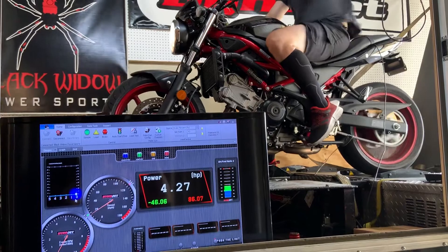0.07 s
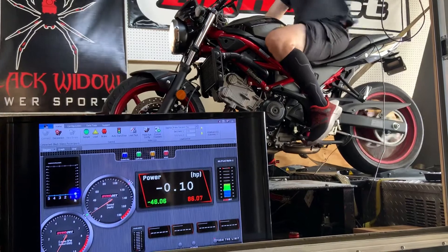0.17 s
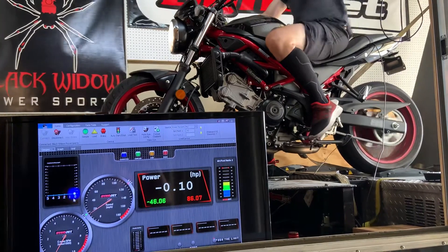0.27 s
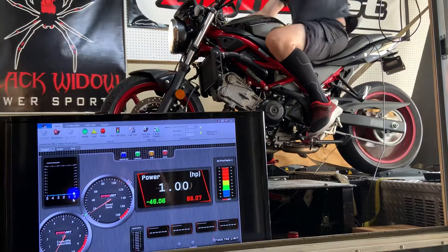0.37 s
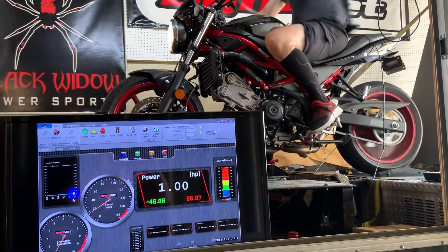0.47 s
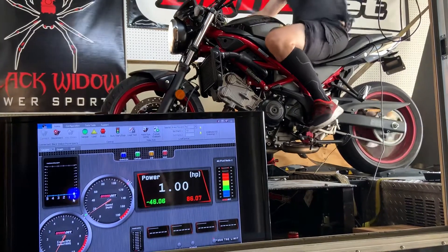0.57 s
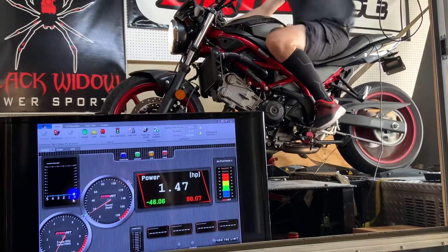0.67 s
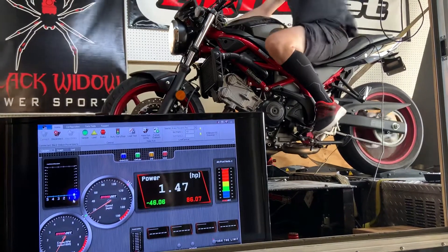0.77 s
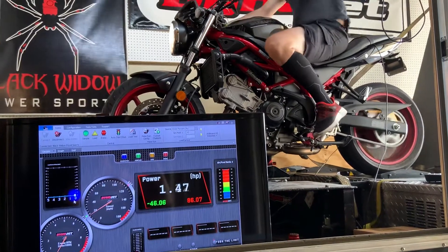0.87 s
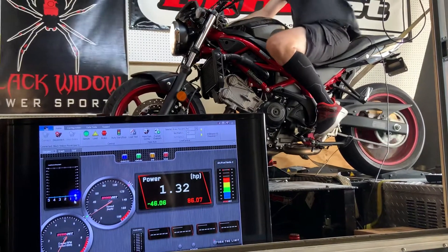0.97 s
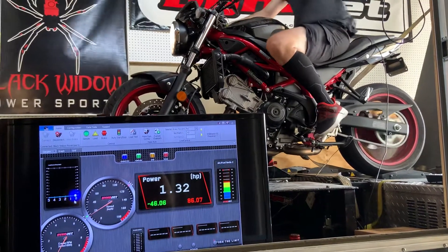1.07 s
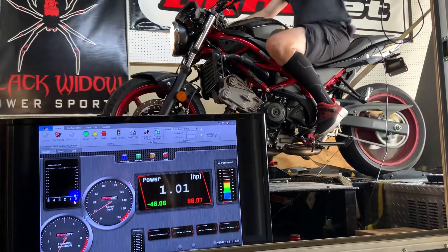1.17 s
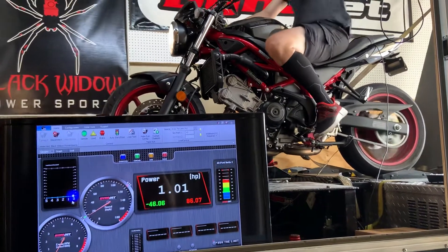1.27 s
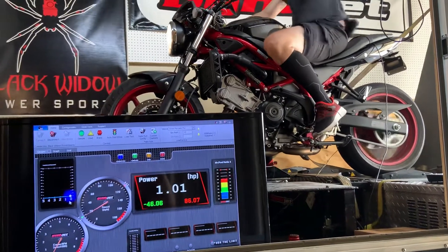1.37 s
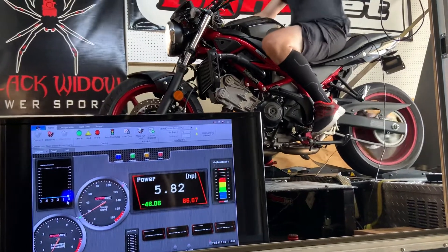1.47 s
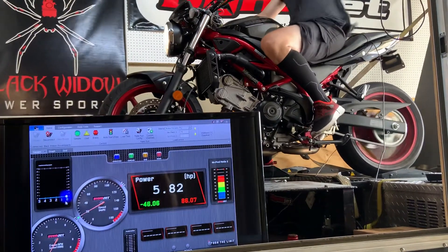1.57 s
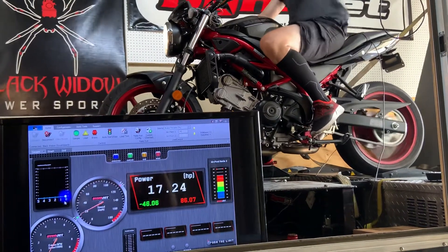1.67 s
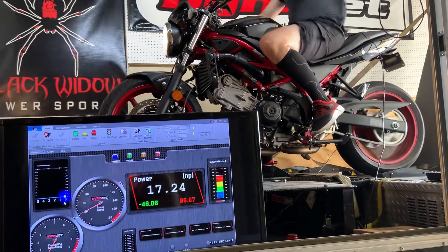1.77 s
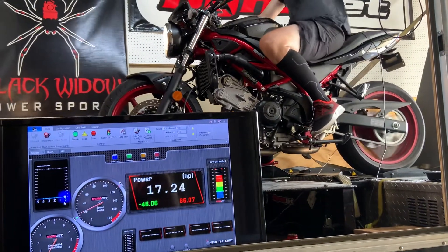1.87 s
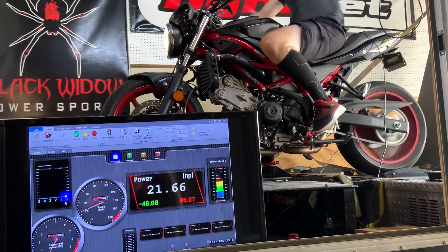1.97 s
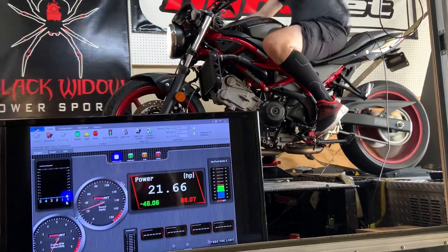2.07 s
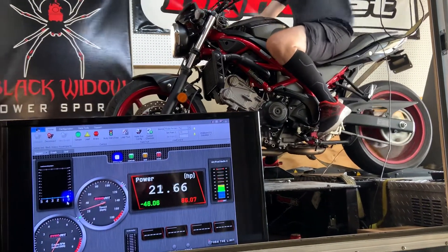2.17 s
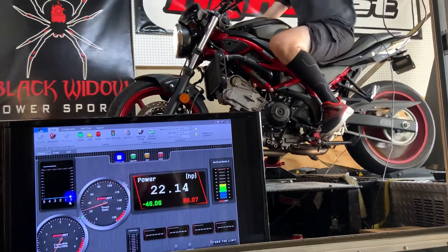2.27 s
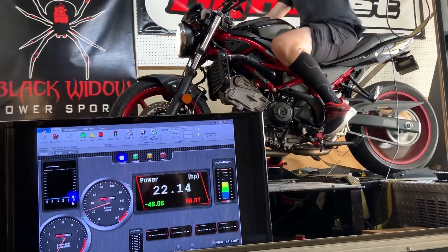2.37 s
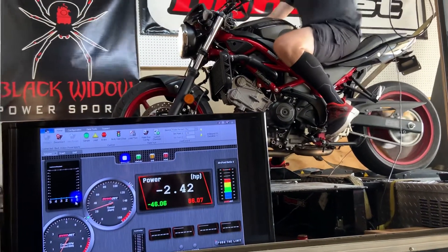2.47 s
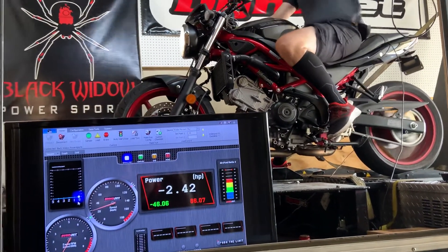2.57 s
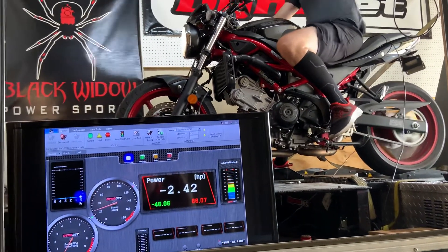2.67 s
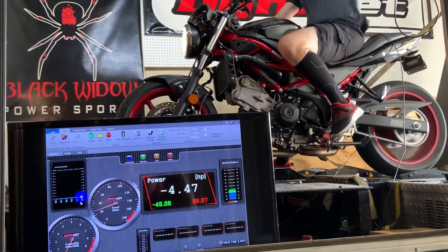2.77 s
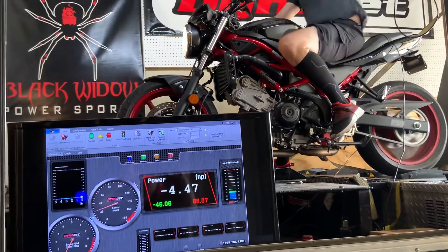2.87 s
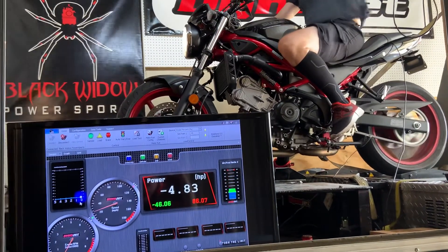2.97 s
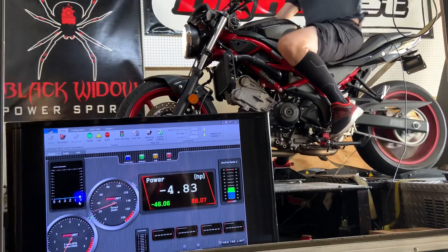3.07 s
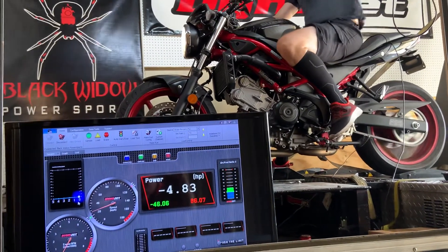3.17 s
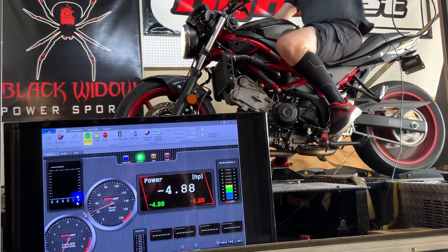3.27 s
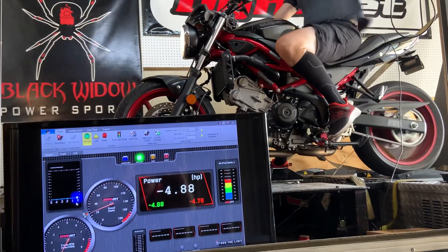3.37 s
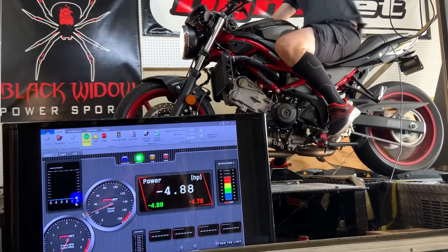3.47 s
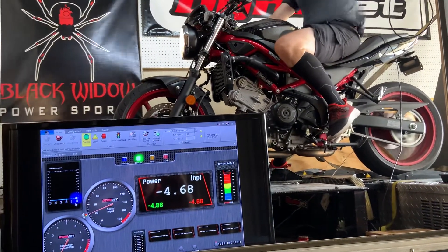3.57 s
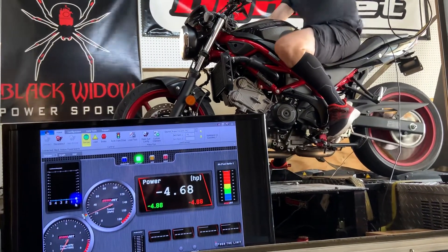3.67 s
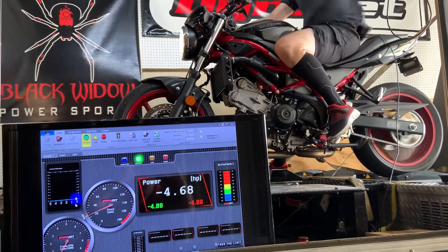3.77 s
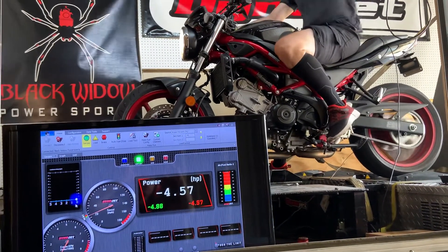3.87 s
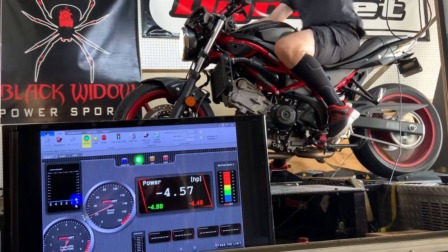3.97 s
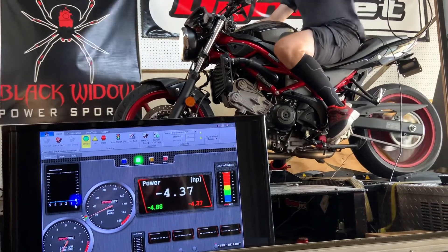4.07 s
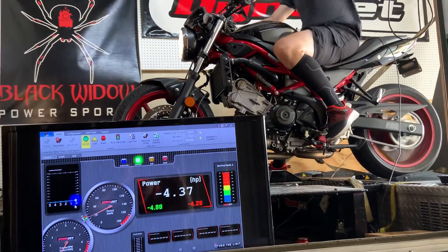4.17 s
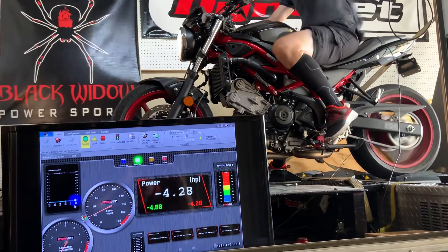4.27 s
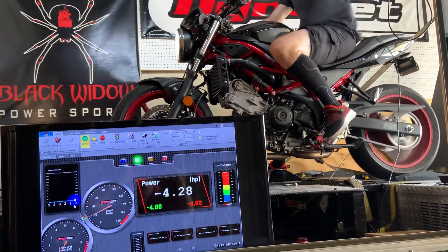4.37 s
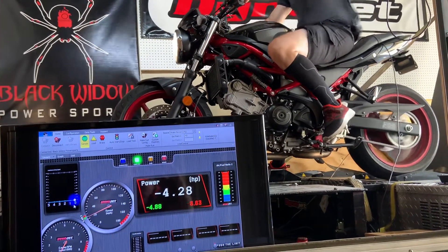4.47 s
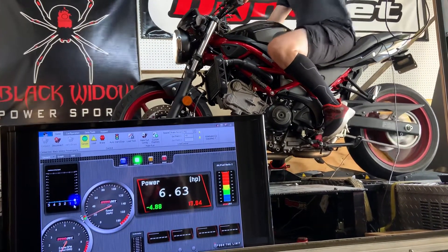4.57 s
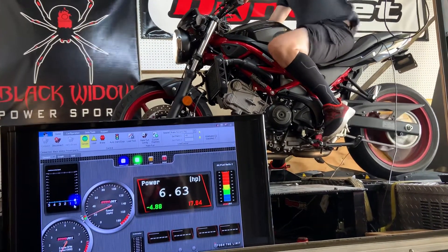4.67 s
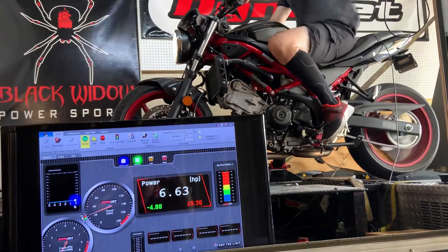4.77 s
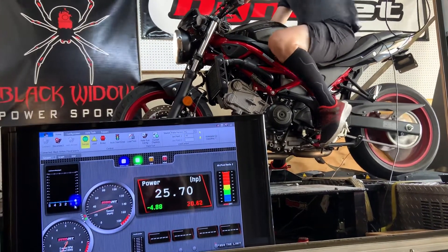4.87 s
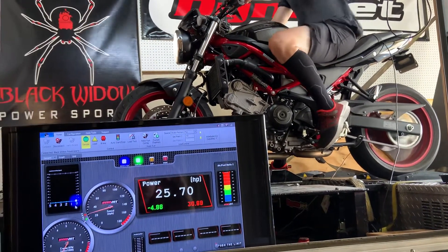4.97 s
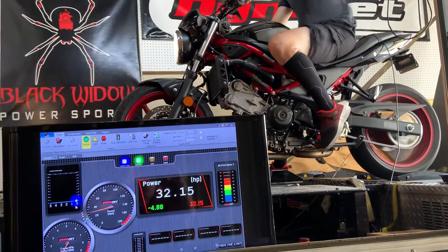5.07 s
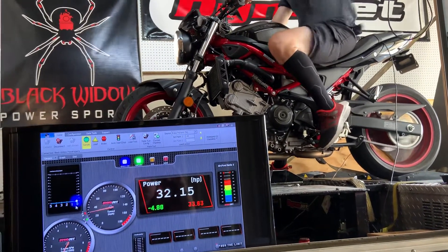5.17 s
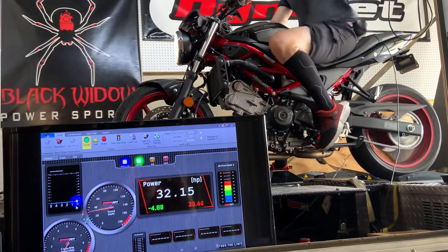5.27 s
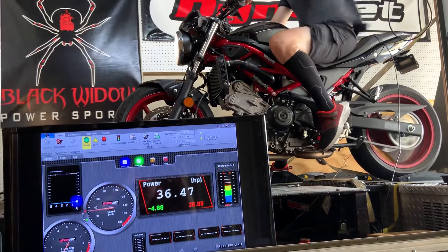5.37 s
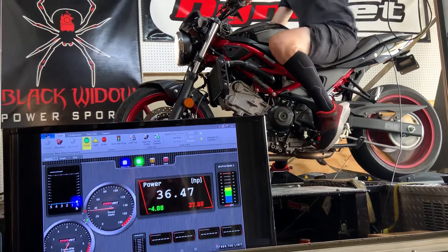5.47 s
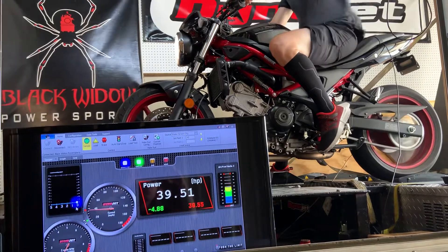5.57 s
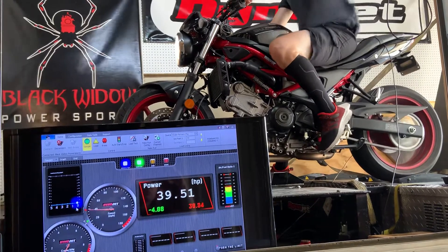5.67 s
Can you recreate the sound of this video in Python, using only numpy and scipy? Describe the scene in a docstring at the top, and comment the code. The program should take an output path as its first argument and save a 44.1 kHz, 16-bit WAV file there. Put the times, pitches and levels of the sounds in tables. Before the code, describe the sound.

A twin-cylinder motorcycle burbles unevenly, revs up hard, drops into a droning coast with chain rattle, then pulls loudly upward in a hard-walled workshop.

```python
"""A V-twin motorcycle on a roller dynamometer: light-throttle burble, blip, coast-down, full-load pull.
Uneven firing pulses ring the pipe and bark around the shop; on the coast a pumped-air drone takes over.
The slack chain rattles off load; valve gear, chain and tyre hiss with load; the tyre rumbles throughout.
Throttle and engine speed set the levels; gain steps down once the sound has stayed loud."""
import sys
import numpy as np
from scipy import signal
from scipy.fft import rfft, irfft, next_fast_len
from scipy.io import wavfile
from scipy.ndimage import uniform_filter1d

SR = 44100
rng = np.random.default_rng(int(sys.argv[2]) if len(sys.argv) > 2 else 0)


def generate_wav(sig):
    """Save sig (samples, or channels by samples) to the path in sys.argv[1] as 16-bit PCM at SR."""
    pcm = np.round(np.clip(np.atleast_2d(sig).T, -1, 1) * 32767).astype(np.int16)
    wavfile.write(sys.argv[1], SR, pcm)


N = 252693

# Engine speed. Each row: time in seconds, four-stroke cycles per second.
SPEED_CURVE = [(0.0, 17.36), (0.15, 18.5), (0.5, 18.81), (0.9, 18.95), (1.1, 19.58), (1.3, 21.09),
               (1.5, 23.36), (1.7, 25.98), (1.9, 28.73), (1.98, 28.49), (2.1, 28.22), (2.22, 27.1),
               (2.37, 28.29), (2.9, 26.87), (3.45, 25.35), (4.0, 23.9), (4.28, 23.42), (4.4, 26.36),
               (4.55, 28.3), (4.7, 30.31), (4.95, 33.94), (5.2, 37.41), (5.45, 41.09), (5.73, 45.03)]
# Rider's hand. Each row: time in seconds, throttle opening from 0 to 1.
THROTTLE_CURVE = [(0, 0.11), (.3, 0.14), (1.0, 0.16), (1.22, 0.22), (1.34, 0.4), (1.55, 0.74), (1.92, 1),
                  (1.985, 0.03), (2.6, 0.02), (4.16, 0.03), (4.21, 0.16), (4.31, 0.29), (4.48, 0.54),
                  (5.73, 1)]
# Coasting drone, before load fades it. Each row: time in seconds, level in dB.
DRONE_CURVE = [(1.9, -19), (2.0, -11), (2.07, -22), (2.22, -17.5), (2.3, -25.5), (2.4, -16.5), (2.6, -20),
               (2.7, -17.5), (3.0, -16.5), (3.3, -18.5), (3.55, -19.5), (4.15, -20)]
# Lifts of the thud at the low resonance. Each row: multiple of the cycle rate, lift in dB.
BOOM_LIFTS = [(2, 10.5), (3, 12), (4, 9)]
# Resonances and notches of pipe and room. Each row: frequency in Hz, relative gain in dB.
PIPE_RESPONSE = [(25, -36), (40, -15), (52, -9), (63, -13), (76, -3), (90, -14), (130, -14), (150, -6),
                 (162, -7), (175, 0), (190, -.5), (202, -13), (215, -7), (243, -5), (260, -8), (272, -19),
                 (285, -10), (305, -5), (322, -3), (347, -11), (370, 0), (388, -14), (402, -5), (432, -12),
                 (455, -4), (482, -13), (500, -14), (515, -9), (535, -14), (560, -12), (595, -18),
                 (630, -9), (655, -22), (685, -14), (725, -13), (770, -26), (1100, -45), (4000, -80)]
# Air pumped by the unfired engine. Each row: multiple of the cycle rate, relative level in dB.
PUMPING_ORDERS = [(2, 7), (3, 5), (4, -1), (5, 13.5), (6, -7), (7, 4), (8, -2), (9, -2), (10, -3), (11, -8),
                  (12, -14), (13, -8), (14, -3), (15, -7)]
# Bark of the pulses. Each row: frequency in Hz, relative density in dB per Hz.
RASP_SPECTRUM = [(400, -57.5), (650, -4), (780, -2), (880, 4), (950, 4), (1080, 4.5), (1230, -3.5),
                 (1400, -0.5), (1650, -11.5), (1900, -8.5), (2300, -17), (2650, -16), (3300, -37.5),
                 (7000, -47), (12000, -52)]
# Hiss of valve gear, chain and tyre. Each row: frequency in Hz, relative density in dB per Hz.
HISS_SPECTRUM = [(300, -15), (1000, 3), (1850, 7), (2300, 4), (2900, 2), (4300, 1.5), (5200, -4),
                 (6800, -3.5), (8500, -6), (10000, -3), (11800, -3.5), (13500, -8), (15500, -6)]
# Tyre on the roller. Each row: frequency in Hz, relative density in dB per Hz.
RUMBLE_SPECTRUM = [(25, 4), (65, 33.5), (130, 12), (260, 23.5), (345, 17.5), (372, 25), (400, 19),
                   (480, 17), (580, 14.5), (730, 14.5), (830, 11), (1300, 6.5), (2500, -11), (8000, -61)]
# Slack chain. Each row: frequency in Hz, relative density in dB per Hz.
RATTLE_SPECTRUM = [(300, -27.5), (620, -4.5), (800, -2), (960, -0.5), (1150, -6.5), (1400, -2), (1600, -17),
                   (1780, -1), (2300, -9.5), (6000, -45)]
# Reflections that differ between the ears. Each row: frequency in Hz, side relative to mid in dB.
WIDTH_RESPONSE = [(60, -22), (125, -12.5), (250, -16), (500, -7), (1000, -6.5), (2200, -3), (4400, -0.5),
                  (15000, 1)]
# Round trips between pipe, floor and walls. Each entry: delay in seconds.
BOUNCE_DELAYS_S = [.0019, .0043, .0071, .0113]

# All speeds below are in engine cycles per second.
# Uneven combustion: amount at the reference speed, power of its fall with speed, steadying by throttle.
UNEVEN_SPEED, UNEVEN_AMOUNT, UNEVEN_FALL_POWER, OPEN_STEADYING = 20.6, 0.6, 2.1, 0.38
LEAST_UNEVEN = .07
SECOND_CYLINDER_CYCLES = 3 / 8
# Opening that fills the cylinders three quarters; time for the load to die away.
FILLING_OPENING, EMPTYING_S = 0.22, 0.041
# Fired note: level at full load, change at no load, fade past the pipe's best speed.
NOTE_DB, NOTE_UNLOADED_DB, BEST_SPEED, NOTE_FADE_DB_PER_SPEED = -9.5, -23.5, 33.4, 0.45
THUD_DB, BOOM_HZ, BOOM_WIDTH_HZ = -33, 74.9, 13
# Rasp: level at no load, rise at full load, speed of full development, loss below it.
RASP_DB, RASP_LOAD_DB, RASP_SPEED, RASP_LOSS_DB_PER_SPEED = -43.5, 24.5, 31.1, 1.51
RASP_UNEVEN_DB = 13.5  # uneven burns crack louder
TREBLE_HZ, TREBLE_DB_PER_SPEED = 1600, 0.45
RATTLE_DB, RATTLE_PER_S, RATTLE_SPREAD_DB = -34.5, 700, 0.5
HISS_DB, HISS_LOAD_DB = -45.5, 8.5  # no load; rise at full load
RUMBLE_DB = -26.5
LOUD_DB, GAIN_STEP_DB, GAIN_WAIT_S, GAIN_HOLD_S, GAIN_RAMP_S = -10.5, -3, 0.216, 0.633, 0.01
CUTOFF_HZ = 15900


def engine_load(opening):
    """Cylinders fill at once as the throttle opens and empty more slowly; 0-1."""
    log_filling = np.log(np.tanh(opening / FILLING_OPENING) + 1e-9)
    decay = np.arange(N) / SR / EMPTYING_S
    return np.exp(np.maximum.accumulate(log_filling + decay) - decay)


def unevenness(speed, opening):
    """Burns vary most at low speed on a small throttle."""
    by_speed = UNEVEN_AMOUNT * (UNEVEN_SPEED / speed) ** UNEVEN_FALL_POWER
    return np.clip(by_speed * (1 - OPEN_STEADYING * opening), LEAST_UNEVEN, 1)


def firings(cycle, uneven, rear_strength, scatter, jitter_s):
    """Two blow-downs a cycle, 270 and 450 crank degrees apart; poor burns vary in strength and timing."""
    out = np.zeros(N)
    for offset, strength in ((0, 1), (SECOND_CYLINDER_CYCLES, rear_strength)):
        at = np.flatnonzero(np.diff(np.floor(cycle - offset)) > 0)
        timing, size = rng.standard_normal((300, 2))[:len(at)].T
        late = (timing * uneven[at] * jitter_s * SR).astype(int)
        burn = np.maximum(1 + scatter * uneven[at] * size, 0)
        out[np.clip(at + late, 0, N - 1)] += strength * burn
    return rms_one(out)


def gas_puffs(pulses, decay_s):
    """Turbulence follows each blow-down and dies away."""
    gate = signal.lfilter([1], [1, -np.exp(-1 / (decay_s * SR))], pulses)
    return rms_one(gate * rng.standard_normal(N))


def pumping(cycle, uneven, flutter):
    """The unfired engine pumps air in smooth waves at multiples of the cycle rate: a low drone."""
    drone = np.zeros(N)
    for multiple, db in PUMPING_ORDERS:
        wave = np.cos(2 * np.pi * (round(multiple) * cycle + rng.random()))
        drone += from_db(db) * wave * (1 + flutter * uneven * drift(22.31))
    return drone


def smear(x, feedback):
    """All-pass bounces blend each stroke into the next without colouring it."""
    size = next_fast_len(N + SR // 2)
    spectrum = rfft(x, size)
    for bounce_s in BOUNCE_DELAYS_S:
        delay = np.exp(-2j * np.pi * np.arange(len(spectrum)) * SR / size * bounce_s)
        spectrum = spectrum * (delay - feedback) / (1 - feedback * delay)
    return irfft(spectrum, size)[:N]


def exhaust(pulses, puffs, drone, opening, load, uneven,
            soft_hz, turbulence, firing_from, coast_pulse_db):
    """Pulses sharpen as the throttle opens; the pumping drone takes over as the load dies away."""
    source = smear(pulses + turbulence * uneven * puffs, feedback=.52)
    soft = cut(source, soft_hz, "low", order=1)
    fired = colour(opening * source + (1 - opening) * soft, PIPE_RESPONSE)
    coasting = colour(drone, PIPE_RESPONSE)
    burning = np.clip(load / firing_from, 0, 1)
    fired_gain = burning + (1 - burning) * from_db(coast_pulse_db)
    return fired_gain * fired / loudness(fired) + (1 - burning) * coasting / loudness(coasting)


def note_level(speed, load):
    """Fired note and coasting drone share the pipe; their joint level in dB."""
    fade_db = NOTE_FADE_DB_PER_SPEED * np.maximum(speed - BEST_SPEED, 0)
    fired = from_db(NOTE_DB + NOTE_UNLOADED_DB * (1 - load) - fade_db)
    drone = (1 - load) * from_db(in_time(DRONE_CURVE))
    return 20 * np.log10(np.hypot(fired, drone))


def thud_level(speed):
    """Low multiples lift the thud as they near the resonance; dB."""
    return THUD_DB + sum(lift_db * bell(round(multiple) * speed, BOOM_HZ, BOOM_WIDTH_HZ)
                         for multiple, lift_db in BOOM_LIFTS)


def boom(wave, note_db, thud_db):
    """The exhaust's low thud and main note swell separately."""
    thud = cut(cut(wave, 105, "low", order=6), 38, "high")
    note = cut(wave, 105, "high", order=6)
    # The halves meet in opposite phase, so one is inverted.
    return from_db(note_db) * note / loudness(note) - from_db(thud_db) * thud / loudness(thud)


def rasp_level(speed, load, uneven):
    """The bark grows with load, speed and uneven burning; dB."""
    loss_db = RASP_LOSS_DB_PER_SPEED * np.maximum(RASP_SPEED - speed, 0)
    return RASP_DB + RASP_UNEVEN_DB * uneven + load * (RASP_LOAD_DB - loss_db)


def rasp(pulses, puffs, speed, breathiness, direct, t60):
    """Sharp pulse edges bark around the shop, brighter with speed; unit level at 750-2200 Hz."""
    edge = pulses + breathiness * puffs
    bark = colour(shop(edge, t60) + direct * edge, RASP_SPECTRUM)
    treble_gain = from_db(TREBLE_DB_PER_SPEED * (speed - RASP_SPEED))
    treble = treble_gain * cut(bark, TREBLE_HZ, "high", order=4)
    bark = cut(bark, TREBLE_HZ, "low", order=4) + treble
    return bark / band_loudness(bark, 750, 2200)


def chain(cycle, load, surge):
    """Random link contacts, in a flurry once a cycle, rattle off load. Mid and side."""
    rate_per_s = RATTLE_PER_S * (1 + surge * np.cos(2 * np.pi * cycle))
    strength_db = RATTLE_SPREAD_DB * np.minimum(rng.exponential(1, (2, N)), np.pi)
    sizes = from_db(strength_db) * rng.choice([-1, 1], (2, N))
    contacts = sizes * (rng.random((2, N)) < rate_per_s / SR)
    slack = np.sqrt(np.clip(1 - load ** 4, 0, 1))
    return from_db(RATTLE_DB) * slack * spread(contacts, RATTLE_SPECTRUM)


def machinery(unsteadiness_db, direct, t60):
    """Slightly unsteady noise of valve gear, chain and tyre; mid is unit level at 9.8-12 kHz. Mid and side."""
    noise, around = rng.standard_normal((2, N)) * from_db(unsteadiness_db * drift(130))
    mid = colour(rms_one(shop(noise, t60) + direct * noise), HISS_SPECTRUM)
    side = colour(colour(rms_one(around), HISS_SPECTRUM), WIDTH_RESPONSE)
    return np.array([mid, side]) / band_loudness(mid, 9800, 12000)


def roller():
    """Shaped noise: the tyre rumbles on the drum whatever the throttle does. Mid and side."""
    return from_db(RUMBLE_DB) * spread(rng.standard_normal((2, N)), RUMBLE_SPECTRUM)


def shop(x, t60):
    """Dense decaying reflections off hard walls; t60 in seconds."""
    t = np.arange(SR // 2) / SR
    echoes = rng.standard_normal(len(t)) * from_db(-60 * t / t60)
    return signal.fftconvolve(x, echoes / np.linalg.norm(echoes))[:N]


def spread(pair, spectrum):
    """Two unrelated signals become the mid and side of one sound."""
    mid, side = [rms_one(colour(x, spectrum)) for x in pair]
    return np.array([mid, colour(side, WIDTH_RESPONSE)])


def colour(x, spectrum):
    """Shape by a (Hz, dB) table; minimum phase, so peaks ring after each pulse."""
    size = 2 * next_fast_len(N // 2 + SR // 8)
    hz, db = np.transpose(spectrum)
    bins_hz = np.maximum(np.arange(size // 2 + 1) * SR / size, 1)
    gain = from_db(np.interp(np.log(bins_hz), np.log(hz), db))
    cepstrum = irfft(np.log(gain))[:size // 2]
    cepstrum[1:] *= 2
    return irfft(rfft(x, size) * np.exp(rfft(cepstrum, size)), size)[:N]


def cut(x, hz, kind, order=2):
    """Butterworth low- or high-pass."""
    return signal.sosfilt(signal.butter(order, hz, kind, fs=SR, output="sos"), x)


def bell(x, centre, width):
    """Resonance curve: 1 at the centre, a half at the edges of the width."""
    return 1 / (1 + (2 * (x - centre) / width) ** 2)


def drift(knots_per_s):
    """Random variation with unit rms, joined by straight lines."""
    knots = rng.standard_normal(2000)
    return rms_one(np.interp(np.arange(N) / SR * knots_per_s, np.arange(len(knots)), knots))


def loudness(x):
    """Running rms over a few engine cycles."""
    size = SR // 12
    power = uniform_filter1d(uniform_filter1d(x ** 2, size), size)
    return np.sqrt(np.abs(power) + 1e-14)


def band_loudness(x, low_hz, high_hz):
    """Running rms within one band."""
    return loudness(cut(cut(x, low_hz, "high", order=4), high_hz, "low", order=4))


def from_db(db):
    """Decibels to gain."""
    return 10 ** (np.asarray(db) / 20)


def rms_one(x):
    """Scale to unit power."""
    return x / np.sqrt(np.mean(x ** 2) + 1e-20)


def in_time(rows):
    """A (seconds, value) curve, sample by sample."""
    s, values = np.transpose(rows)
    return np.interp(np.arange(N) / SR, s, values)


def since(flag):
    """Seconds since a condition last held; infinite before it first holds."""
    t = np.arange(N) / SR
    return t - np.maximum.accumulate(np.where(flag, t, -np.inf))


def scene():
    """One crankshaft drives exhaust and chain; the walls spread the sound to the sides."""
    speed, opening = in_time(SPEED_CURVE), np.clip(in_time(THROTTLE_CURVE), 0, 1)
    cycle = np.cumsum(speed) / SR
    load, uneven = engine_load(opening), unevenness(speed, opening)
    pulses = firings(cycle, uneven, rear_strength=0.72, scatter=0.53, jitter_s=0.00021)
    puffs = gas_puffs(pulses, decay_s=.007)
    drone = pumping(cycle, uneven, flutter=.7)
    wave = exhaust(pulses, puffs, drone, opening, load, uneven,
                   soft_hz=600, turbulence=1.0, firing_from=0.68, coast_pulse_db=-15.5)
    bark = rasp(pulses, puffs, speed, breathiness=0.32, direct=0.37, t60=0.22)
    engine = boom(wave, note_level(speed, load), thud_level(speed))
    engine = engine + from_db(rasp_level(speed, load, uneven)) * bark
    engine_side = colour(shop(engine, t60=0.27), WIDTH_RESPONSE)
    hiss_gain = from_db(HISS_DB + HISS_LOAD_DB * load)
    hiss = hiss_gain * machinery(unsteadiness_db=0.93, direct=1.8, t60=0.073)
    mid, side = np.array([engine, engine_side]) + hiss + roller() + chain(cycle, load, surge=.6)
    return np.array([mid + side, mid - side]) * from_db([[-.2], [.2]])


def gain_control(x):
    """Steps the gain down when the sound stays loud, and holds it there for a while afterwards."""
    loud = loudness(x.mean(axis=0)) > from_db(LOUD_DB)
    stayed_loud = since(~loud) > GAIN_WAIT_S
    turned_down = since(stayed_loud) < GAIN_HOLD_S
    ramped = uniform_filter1d(turned_down.astype(float), int(GAIN_RAMP_S * SR))
    return x * from_db(GAIN_STEP_DB * ramped)


def record(dry):
    """The gain is ridden, the loudest peaks are rounded off and the top is cut."""
    ridden = gain_control(dry)
    rounded = ridden / (1 + (ridden / .95) ** 6) ** (1 / 6)
    top_cut = signal.ellip(10, .1, 80, CUTOFF_HZ, fs=SR, output="sos")
    return signal.sosfilt(top_cut, rounded)


dry = scene()
out = record(dry)
generate_wav(out)
```